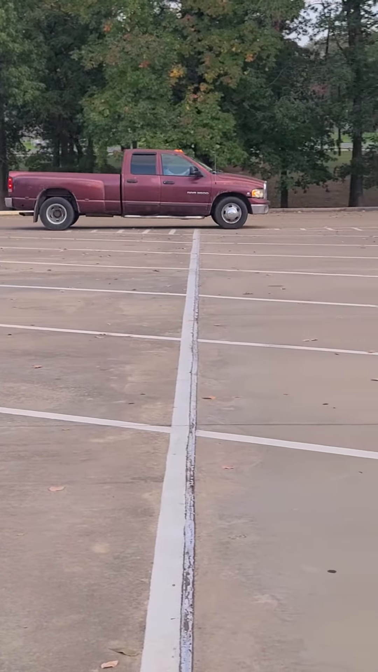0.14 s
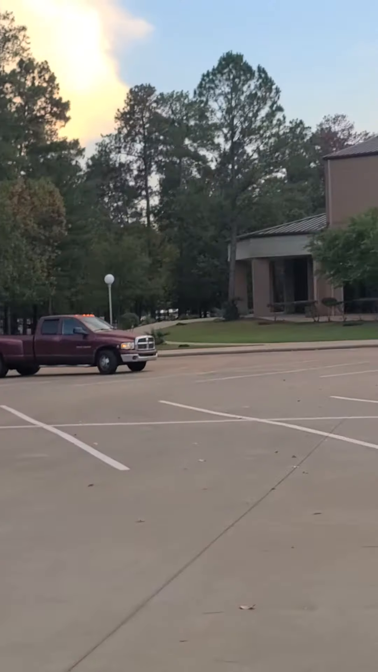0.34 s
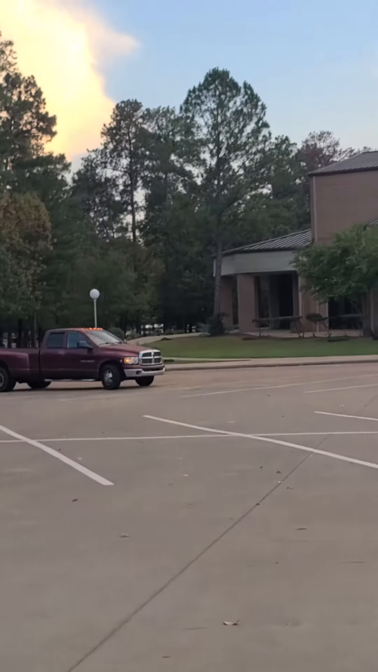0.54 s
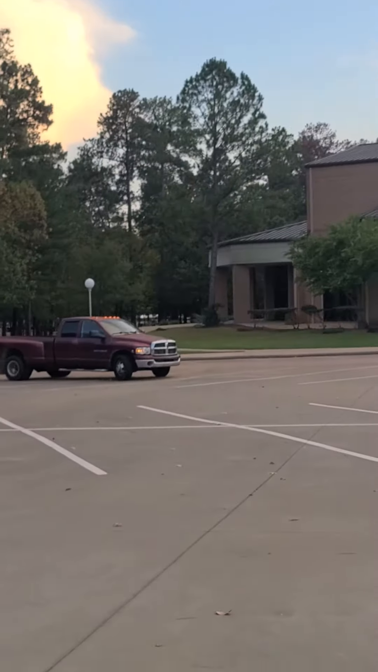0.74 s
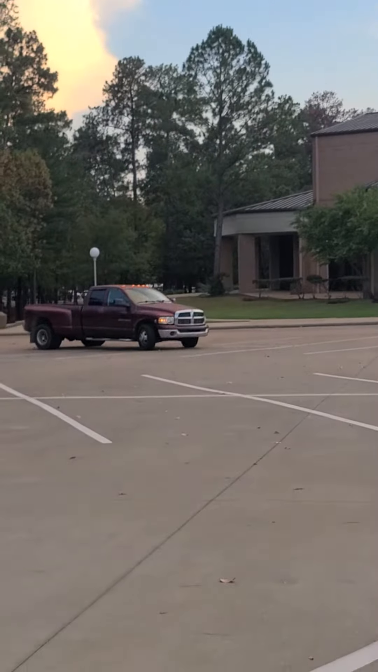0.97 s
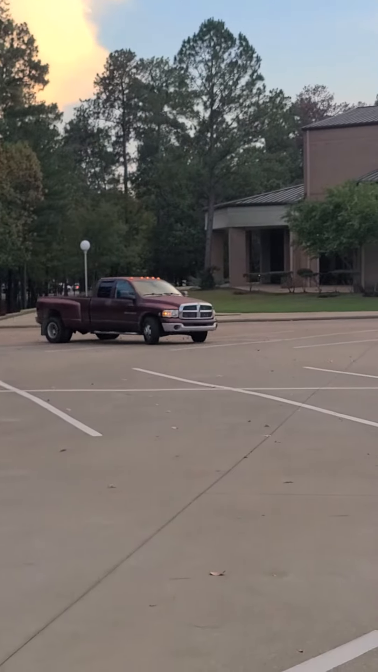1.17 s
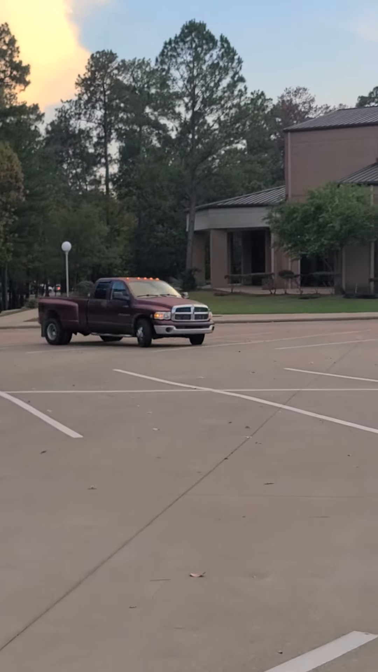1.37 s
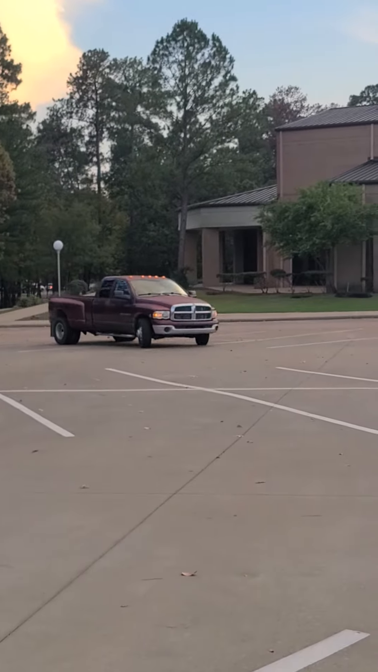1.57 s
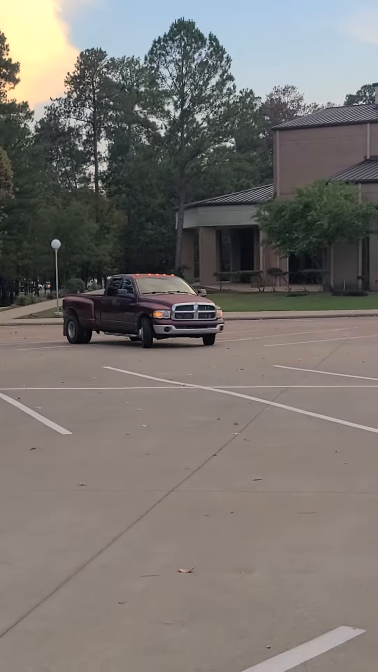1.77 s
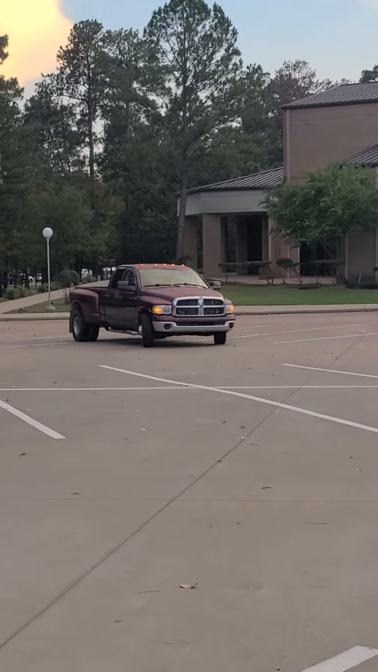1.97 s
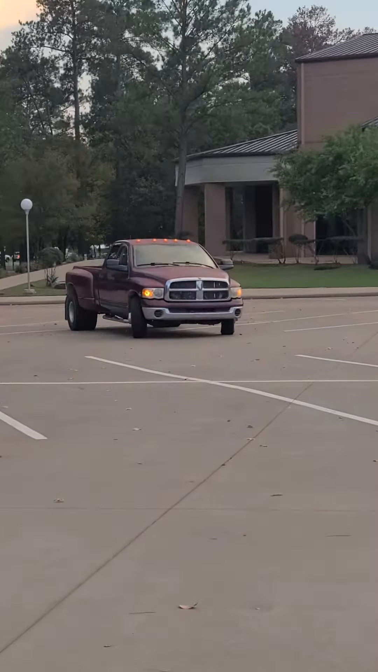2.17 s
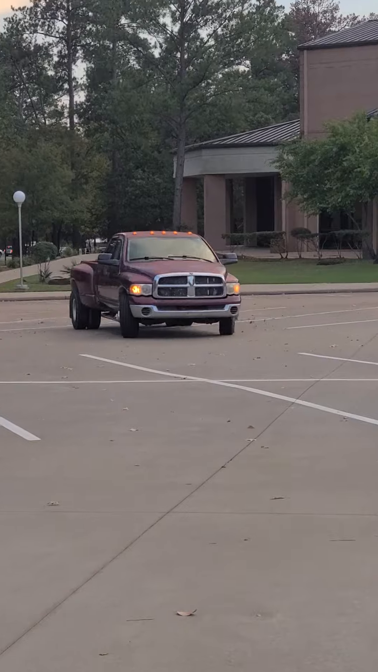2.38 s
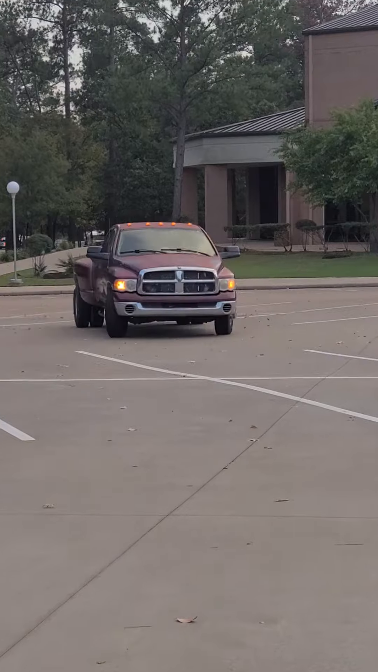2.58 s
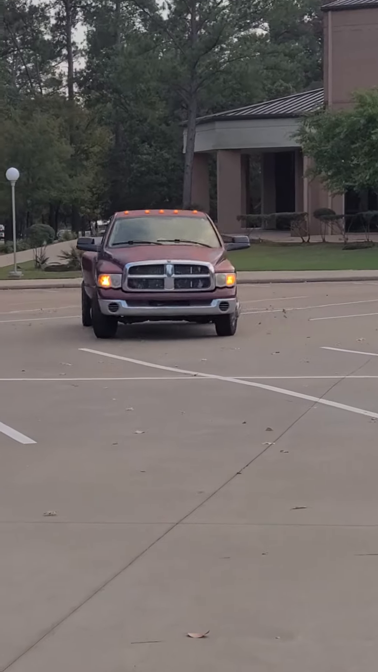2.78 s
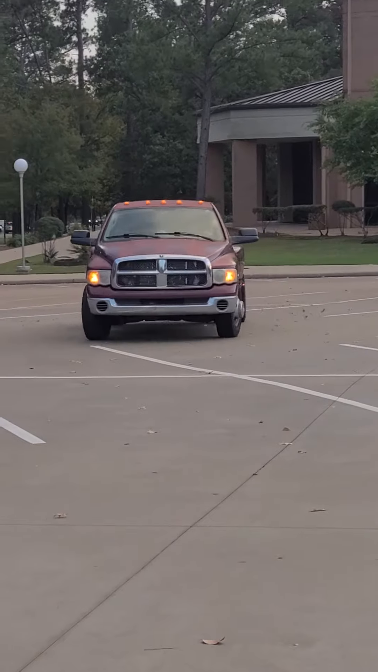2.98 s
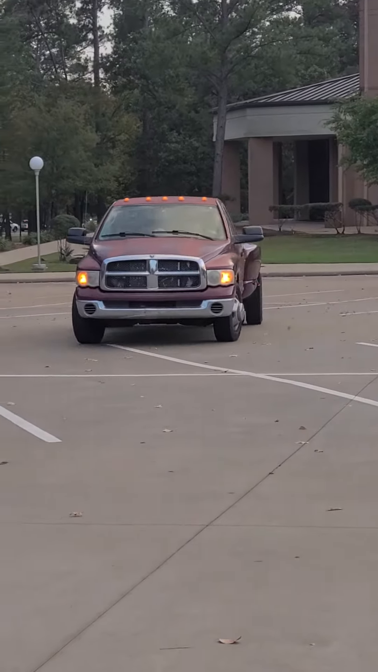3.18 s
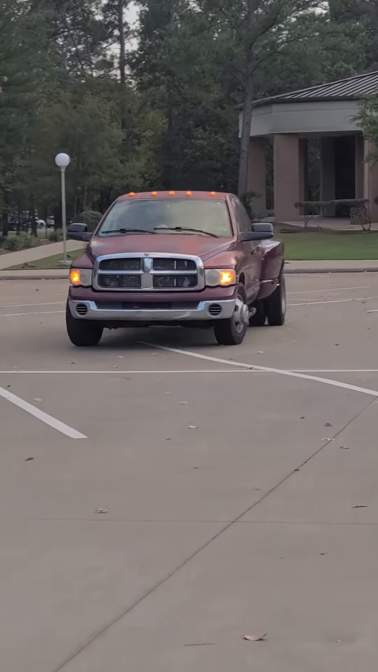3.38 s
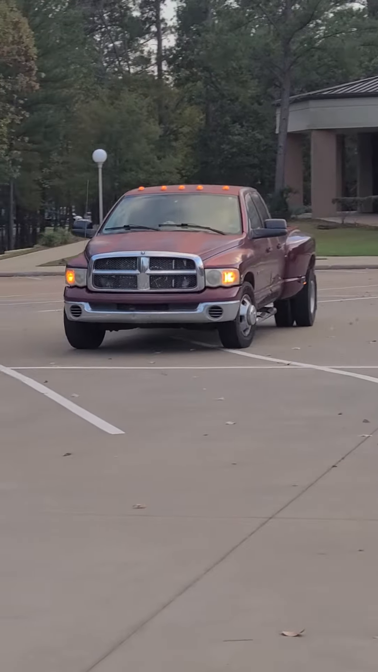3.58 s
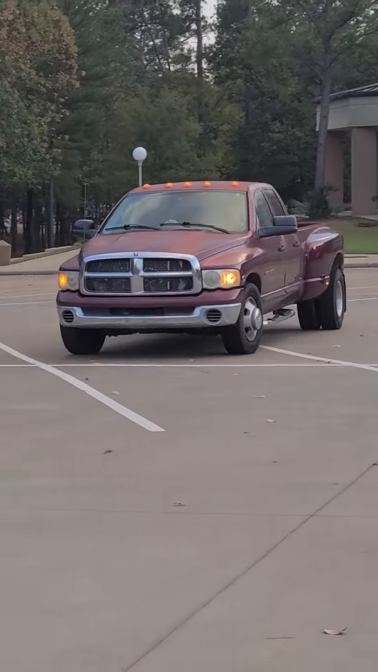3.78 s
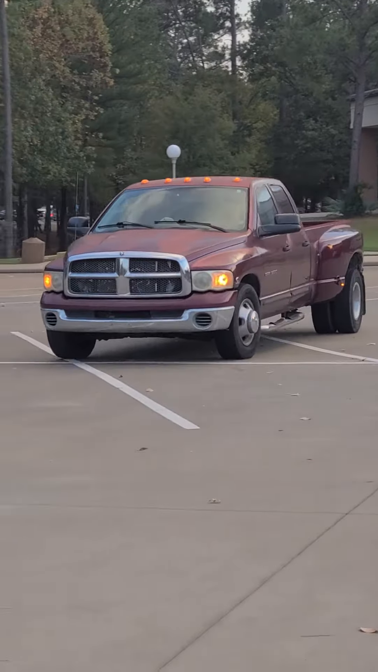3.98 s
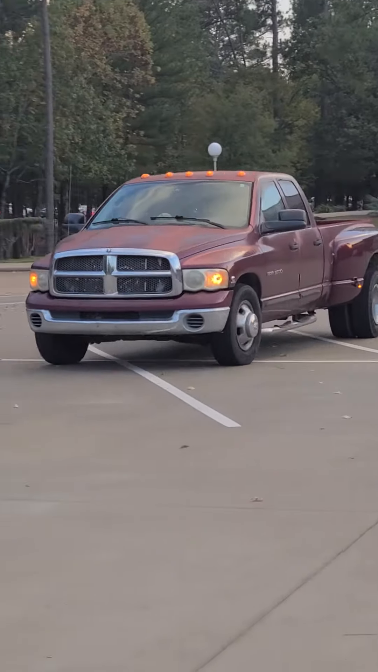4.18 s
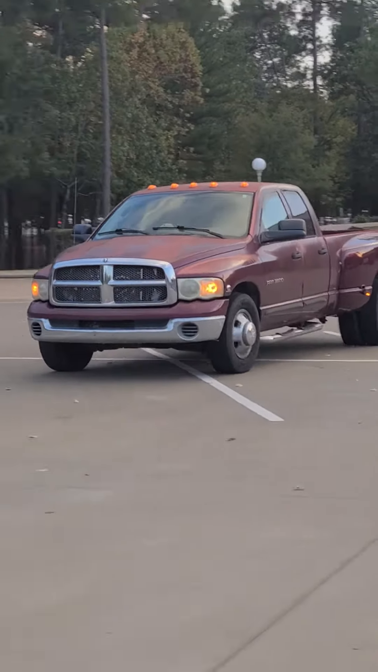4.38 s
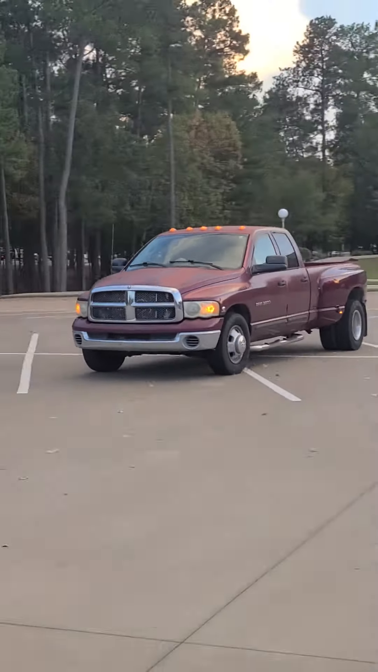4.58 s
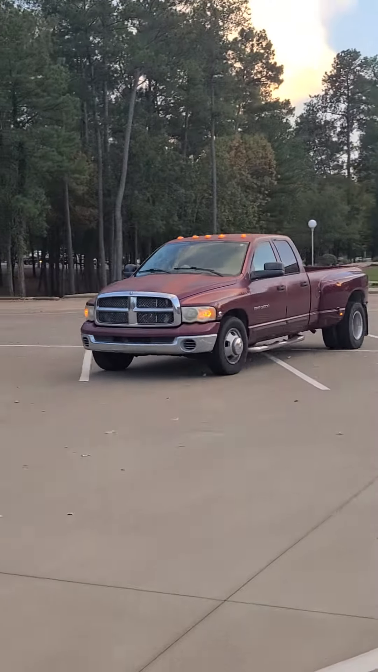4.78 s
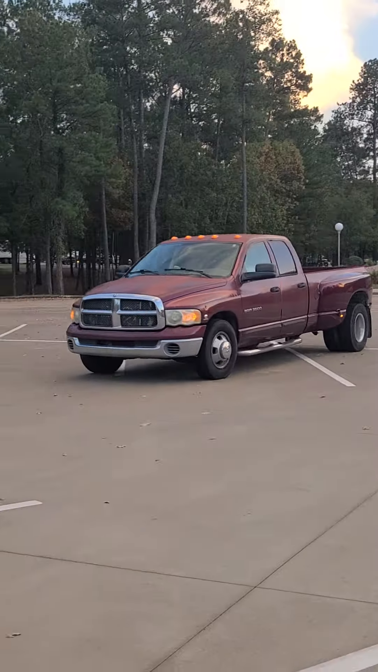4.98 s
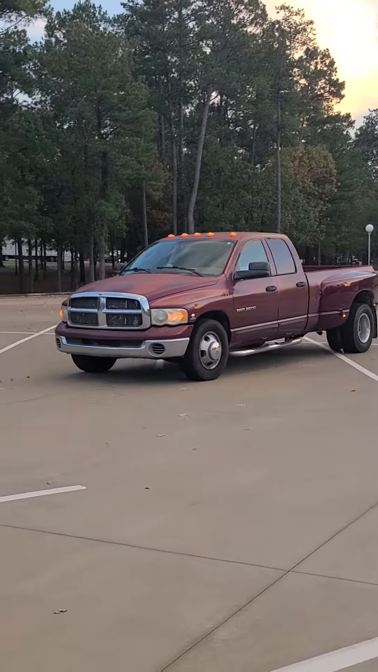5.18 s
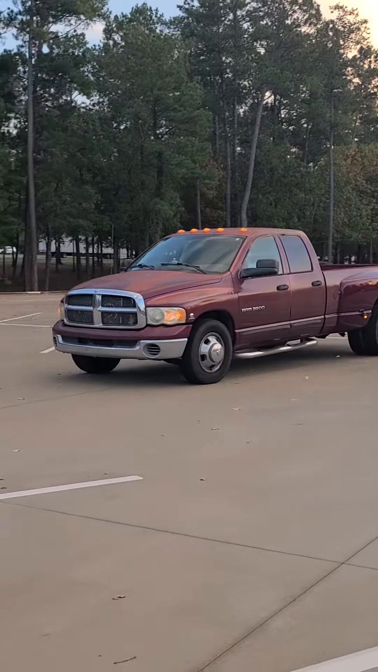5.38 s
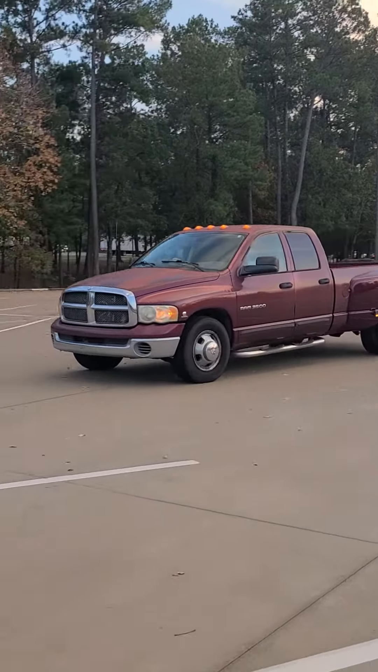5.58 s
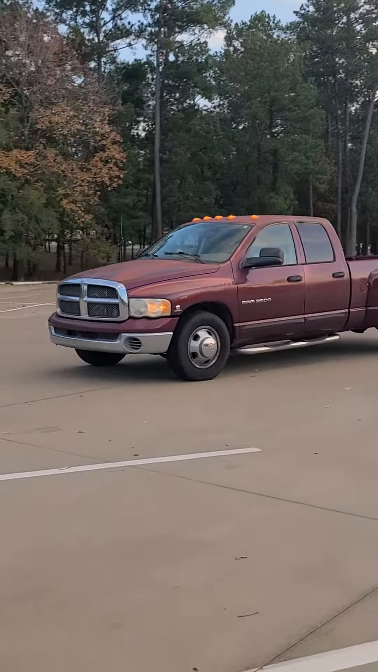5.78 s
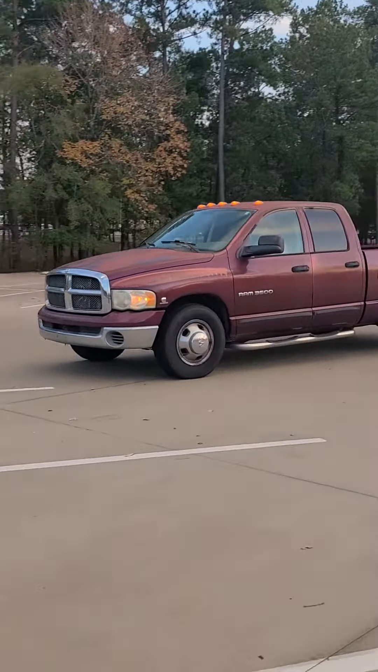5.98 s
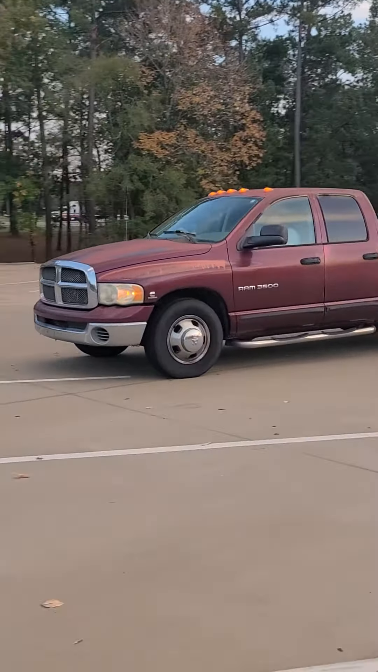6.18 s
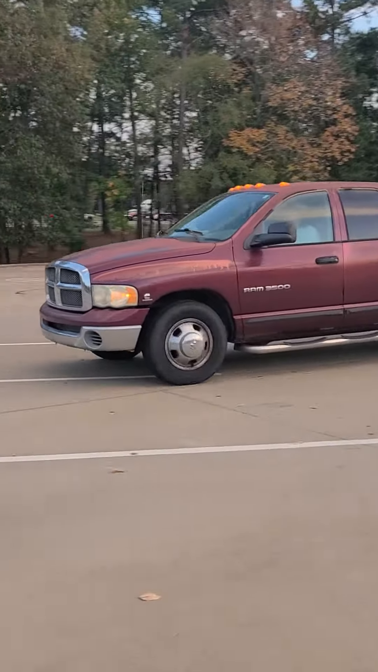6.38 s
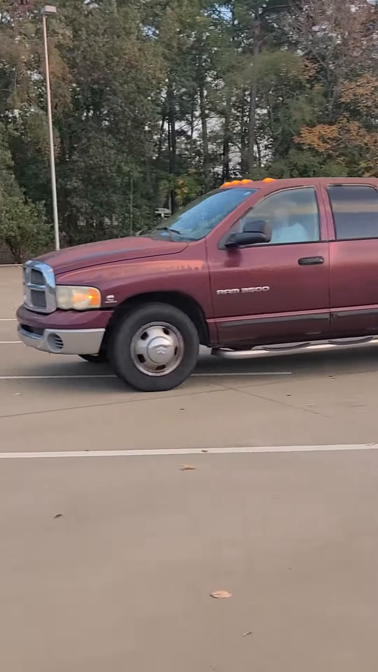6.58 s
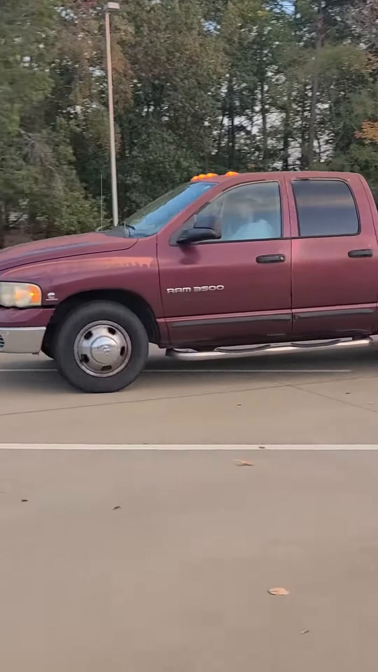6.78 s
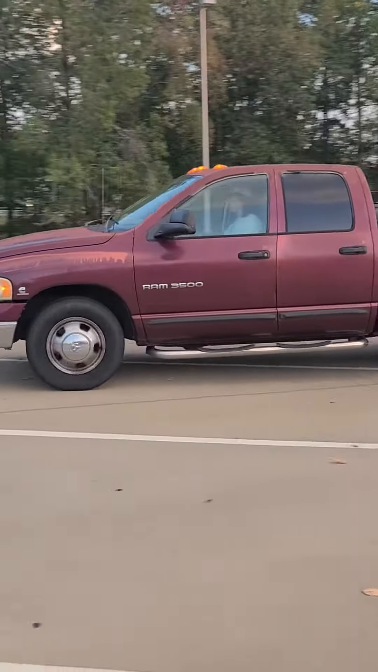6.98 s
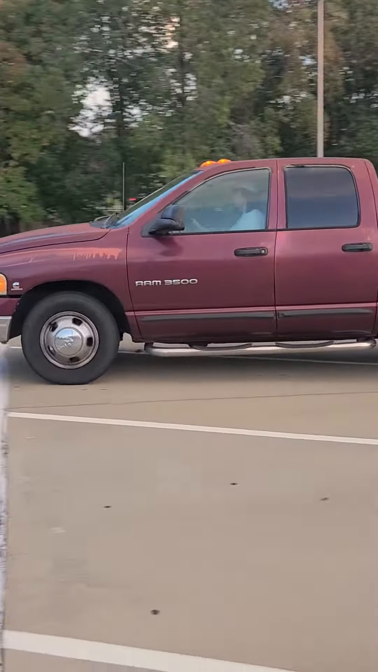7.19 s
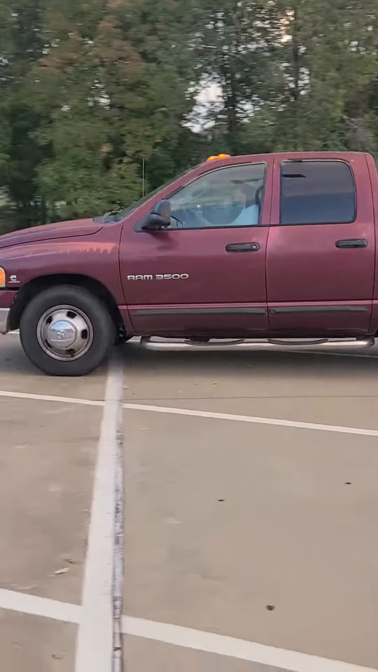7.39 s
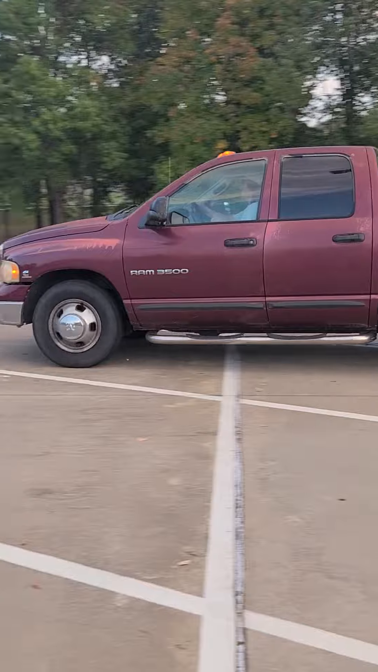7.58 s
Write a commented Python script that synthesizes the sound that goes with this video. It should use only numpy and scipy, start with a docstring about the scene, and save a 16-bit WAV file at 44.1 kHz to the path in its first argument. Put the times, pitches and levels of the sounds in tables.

```python
"""A diesel pickup clatters far off; then the viewpoint jumps and it turns across a paved lot and rolls past.
Its six cylinders knock in noise bursts that ring the block, work hard, drop to idle and pick up again nearby.
Gas rumbles and hums in the exhaust, and a near-pure deep drone swells and fades. Noise shaped in time and pitch
makes the airy treble, a whistle and grit crunching on the concrete. A wavering whine, a faint click where the
viewpoint jumps, a dry tick and a few thin squeaks, where metal rubs, add fine detail."""
import sys
import numpy as np
from scipy import signal
from scipy.fft import rfft, irfft
from scipy.io import wavfile
from scipy.ndimage import uniform_filter1d, minimum_filter1d

SR = 44100
rng = np.random.default_rng(int(sys.argv[2]) if len(sys.argv) > 2 else 0)


def dump(signal):
    """Clip the signal to [-1, 1] and save it as 16-bit WAV at the path in sys.argv[1]."""
    limited = np.clip(np.atleast_2d(signal).T, -1, 1)
    pcm = np.round(limited * 32767).astype(np.int16)
    wavfile.write(sys.argv[1], SR, pcm)


N = 337365
TIME = np.arange(N) / SR  # seconds
BINS = np.fft.rfftfreq(N, 1 / SR)  # Hz
CUT_S = .562  # the viewpoint jumps from far to near here
FIRST_CYLINDER_S = 5.092  # about when the first cylinder fires
IDLE_HZ = 44  # firings per second at idle
EDGE_HZ = 15900  # the sound stops above this pitch

# Engine speed, pulling through the turn and then idling: (time [s], firings per second [Hz])
FIRING_RATE = [(0, 76.5), (.55, 76.5), (.57, 82), (.88, 78), (1.3, 79.5), (1.62, 76), (1.9, 82),
               (2.4, 76.5), (2.62, 75.5), (2.78, 82.5), (3.0, 85), (3.35, 90), (3.7, 86.5), (4.05, 86.5),
               (4.3, 76), (4.8, 51), (5.0, 48.2), (5.25, 44.4), (6.15, 44.3), (6.3, 46.8), (6.47, 48),
               (6.75, 44.6), (7.0, 46.4), (7.3, 45.6), (7.65, 46.4)]
# Loudness as load and distance change, against the usual level: (time [s], level [dB])
ENGINE_LEVEL = [(0, -3.3), (.56, -2), (1.05, 1), (1.3, 0.2), (1.9, -1.5), (2.45, 3), (3.15, 5), (3.55, 5),
                (4.15, 1.9), (4.7, -3.5), (5.2, -5), (6.2, -3), (6.6, -0.1), (6.75, 2.5), (7.0, 3.5),
                (7.38, 2.5), (7.53, -1.1), (7.65, -1)]
# Relative strength of each cylinder's knock, one per cylinder: (level [dB])
CYLINDER_KNOCKS_DB = [-5, -5, -5, -6.5, -9.5, -7]
# Short blips of fuel that lift the near clatter: (time [s], length [s], lift [dB])
FUEL_BLIPS = [(6.321, 0.022, 7), (6.685, 0.032, 3.5)]
# Side of the truck towards the listener: (time [s], side [0 nose, 1 front corner, 2 flank])
FACING = [(.6, 0.52), (1.0, 0.36), (1.5, 0.54), (2.2, 0.44), (3.0, 0), (3.7, 0.26), (4.3, 0.76),
          (4.8, 0.83), (6.0, 1.124), (6.4, 1.15), (6.75, 1.9), (7.35, 1.86), (7.65, 1.3)]

# Colour of the clatter from far off, nose, front corner and flank: (pitch [Hz], relative level [dB per Hz])
FAR_COLOUR = [(250, -18), (340, -9), (440, -17), (570, -5), (650, -6.5), (780, -4), (950, -7), (1150, -7),
              (1400, -11), (1630, -16), (1880, -7.5), (2120, -15), (2470, -9.5), (3300, -22.5), (5070, -26),
              (5910, -20), (9500, -44.5), (13000, -49), (15500, -57)]
NOSE_COLOUR = [(250, -30), (400, -1), (640, -3.5), (850, -2.5), (1000, -1.5), (1350, 0.5), (2100, -3.5),
               (2600, -3.5), (3150, -3.5), (3900, -5), (4600, -16), (6200, -13.5), (7400, -35),
               (10400, -46)]
CORNER_COLOUR = [(250, -22), (380, -1.5), (490, -7.5), (680, -2), (800, -1), (950, -3), (1200, -1),
                 (1600, -7.5), (1850, -2.5), (2350, -7.5), (3100, -5), (4400, -9.5), (6300, -12.5),
                 (7600, -30.5), (10400, -80)]
FLANK_COLOUR = [(250, -44), (400, -8.5), (483, -23), (560, -14), (630, -15), (800, -6), (930, -12),
                (1320, -1.5), (1680, -15.5), (2000, -6.5), (2750, -8), (3650, -7), (4300, -15.5),
                (6230, -20), (8000, -41), (10400, -71)]
# Block and panel resonances from the same four views; near ones go negative where the ground echo cancels:
# (pitch [Hz], width [Hz], lift [dB])
FAR_RINGS = [(727, 46, 4), (1195, 38, 7), (1910, 99, 5.5), (2510, 90, 6.5), (2960, 110, 9.5), (3720, 80, 9),
             (4030, 250, 7), (5930, 240, 6)]
NOSE_RINGS = [(1010, 40, 2), (1177, 12, 7.5), (1270, 37, 1.5), (2390, 100, 4.5), (3010, 89, 5),
              (3290, 280, 3.5), (5000, 200, 4), (5170, 190, -5)]
CORNER_RINGS = [(1746, 140, 5), (2930, 140, 1), (4860, 200, -1), (5320, 400, -6)]
FLANK_RINGS = [(840, 37, 0), (1180, 50, -4), (1342, 55, 0), (2830, 150, 6.5), (4320, 430, -6),
               (4700, 200, -1), (5330, 250, -3)]
# Resonances heard while the truck is across the lot, negative where the ground echo cancels:
# (pitch [Hz], width [Hz], lift [dB])
ACROSS_RINGS = [(1060, 70, -3.5), (1590, 250, 3), (2240, 130, 0.5), (2460, 200, 3), (2680, 90, 1),
                (4560, 280, -3), (4900, 250, 3)]
# How much they stand out as it nears: (time [s], share [0-1])
ACROSS_SHARE = [(1.5, 0.95), (2.3, 0)]

# Relative strength of each piston's slap, one per cylinder: (level [dB])
PISTON_SLAPS_DB = [0, -10, -2, -2, -8, -10]
# Ways the block rings when slapped: (pitch [Hz], width [Hz], relative level [dB])
SLAP_MODES = [(1090, 84, -9.5), (1178, 44, -11), (1300, 150, -13), (1790, 140, -20), (2880, 250, -9)]

# Colour of the gas rumble and of the lowest throb: (pitch [Hz], relative level [dB per Hz])
RUMBLE_COLOUR = [(60, -10), (95, 0), (120, 1), (140, -1), (170, 0.5), (200, 1), (240, -3), (300, -4.5),
                 (400, -12), (520, -19.5), (900, -67)]
THROB_COLOUR = [(10, -46), (25, -32), (36, -17), (46, -5), (62, 4), (75, -14), (100, -3), (200, -68)]
# Standing waves in the exhaust pipe: (pitch [Hz], width [Hz], lift [dB])
PIPE_RINGS = [(180, 19, 2), (237, 11.4, 2.5), (352, 40, 4)]
# Gas rumble in the pipe: (time [s], level [dB])
RUMBLE_LEVEL = [(0, -26), (.25, -28), (.6, -29.5), (1.55, -30.5), (1.9, -28), (2.58, -26.5), (2.75, -25.5),
                (3.6, -23.5), (4.1, -27.5), (4.6, -30.5), (5.2, -31.5), (6.1, -31), (6.35, -29.5),
                (6.75, -29), (7.1, -27), (7.65, -29)]
# Faint engine notes: (multiple of the firing rate [count])
NOTE_ORDERS = [1, 3, 4, 9]
# Their levels against one common level: (level [dB])
NOTES_DB = [-25, -13, -14.5, -19.5]
# Exhaust hum at twice the firing rate: (time [s], level [dB])
HUM_LEVEL = [(.5, -45), (.6, -29.5), (.92, -34.5), (1.25, -25.5), (1.42, -27), (1.55, -39), (1.95, -34),
             (2.25, -37), (2.42, -26.5), (2.7, -32.5), (3.2, -26.5), (3.55, -33), (3.95, -26.5),
             (4.2, -26.5), (4.5, -53), (5.2, -28), (6.0, -34), (6.45, -23), (6.8, -41), (7.65, -27.5)]

# Deep drone: (time [s], pitch [Hz])
DRONE_PITCH = [(0, 83.2), (0.35, 82.4), (.9, 77.7), (1.8, 79.5), (3, 80.3), (5.2, 79.94), (6, 81.33),
               (7.65, 80.5)]
# Swells of the drone, before a small trim; the throb follows them more gently: (time [s], level [dB])
DRONE_LEVEL = [(0, -23.5), (.35, -25), (.45, -39), (.555, -29), (.59, -19.5), (.7, -28), (1.15, -26),
               (1.42, -40), (1.49, -24.5), (1.59, -15), (1.68, -22), (1.81, -22.5), (1.88, -12),
               (1.98, -10.5), (2.04, -26), (2.13, -15.5), (2.25, -14.5), (2.63, -16.5), (2.74, -28),
               (2.93, -9.5), (3.03, -23.5), (3.13, -12.5), (3.2, -24), (3.25, -18), (3.33, -24),
               (3.64, -19), (3.87, -6), (3.96, -15), (4.04, -4.5), (4.14, -8.5), (4.24, -15.5),
               (4.43, -7.5), (4.56, -19), (4.68, -11), (5.0, -13.5), (5.95, -16.5), (6.2, -9.5), (6.4, -14),
               (6.85, -9), (7.1, -14), (7.35, -10.5), (7.48, -17.5), (7.65, -12)]
# The drone's overtones at two and three times its pitch: (time [s], level [dB])
OCTAVE_LEVEL = [(0, -55), (2.1, -49), (2.9, -34), (3.3, -27.5), (3.8, -41), (4.45, -27), (4.8, -43),
                (5.15, -34), (5.45, -47), (5.95, -32), (6.4, -38.5), (7.65, -39)]
TWELFTH_LEVEL = [(0, -52), (.25, -32.5), (.6, -56), (2.6, -39), (2.78, -28), (3.2, -36), (3.5, -39),
                 (4.0, -34), (4.5, -45), (5.5, -48), (6.3, -38), (6.75, -44.5), (7.1, -36), (7.65, -39.5)]

# Whine, loudest head-on: (time [s], level [dB])
WHINE_LEVEL = [(0, -38.5), (.9, -50), (1.7, -49), (2.6, -53), (2.75, -31), (3.2, -37), (3.65, -39),
               (4.0, -56), (4.6, -75)]
# Airy whistle, heard from the flank: (time [s], level [dB])
WHISTLE_LEVEL = [(6.1, -62), (6.36, -45), (6.65, -46), (6.85, -34), (6.95, -48), (7.2, -43.5), (7.48, -50),
                 (7.6, -40), (7.65, -43)]
# Colour of the fine treble: (pitch [Hz], relative level [dB per Hz])
FIZZ_COLOUR = [(6000, -48), (8000, -6), (9000, 5), (11000, 5), (12700, 7.5), (14000, 5), (15800, -0.5)]
# Fine treble, highest as the tyres scrub out of the turn: (time [s], level [dB])
FIZZ_LEVEL = [(.57, -52), (1.0, -47), (2.0, -49), (2.4, -44.5), (3.1, -42.3), (3.7, -42), (4.2, -42.5),
              (4.7, -49.5), (5.2, -51), (6.0, -50), (6.5, -47), (7.2, -48), (7.65, -47.5)]

# Colour of grit as it grinds and as it snaps: (pitch [Hz], relative level [dB per Hz])
GRIT_COLOUR = [(1200, -24), (2400, -10), (3200, 9), (5000, 1), (6300, 5.5), (7800, -17), (10000, -57)]
SNAP_COLOUR = [(3000, -15), (6000, -6), (7800, -17), (9200, -3), (12000, 1.5), (14000, -2), (15500, -1.5)]
# Crunches, with the length scale of their rise: (peak time [s], length [s], grinding [dB], snapping [dB])
CRUNCHES = [(0.654, 0.023, -29, -39.5), (.922, 0.019, -46, -44), (1.585, 0.0029, -31, -25),
            (1.594, 0.0054, -22.5, -25), (1.604, 0.0058, -32, -27), (2.465, 0.0084, -46, -43),
            (2.721, 0.021, -42, -34), (3.504, 0.0047, -54, -23), (3.507, 0.00076, -52, -14),
            (4.28, 0.0018, -55, -37), (4.7812, 0.0012, -31, -34), (4.788, .0014, -26, -27),
            (4.79, 0.011, -31.5, -33), (5.35, 0.029, -40, -40.5), (6.463, .03, -42, -41)]
# A faint click where the viewpoint jumps, then a lone dry tick: (time [s], peak level [dB], half width [s])
CLICKS = [(.563, -24, .000016), (.9873, -8, .0001)]
# Squeaks: (start [s], length [s], pitch [Hz], glide [share of pitch], level [dB], octave against it [dB])
SQUEAKS = [(2.746, 0.15, 6230, .012, -38, -2), (3.758, 0.06, 6260, .01, -48, 8),
           (3.826, 0.087, 6330, -0.0074, -37, 1.5), (7.486, 0.072, 6190, -.024, -32.5, -1.5),
           (7.561, 0.1, 6110, .022, -28, 0)]

# Two microphone ports, left against right: (pitch [Hz], left minus right [dB])
BALANCE = [(60, -3.5), (200, -2.5), (380, -3.5), (700, -2.5), (1290, -2), (2380, -7.5), (4400, -10),
           (6300, -4.5), (9000, -2.5), (13000, -11.5)]
# How alike the two ports sound: (pitch [Hz], likeness [0-1])
LIKENESS = [(60, 0.99), (290, 0.96), (640, 0.85), (1400, 0.84), (3100, 0.85), (6800, 0.2), (15000, 0.32)]
# How far the left port leads: (pitch [Hz], lead [radians])
LEAD = [(60, -0.15), (1200, 0.32), (2200, 0.57), (3000, -0.8), (4100, 1), (4900, -0.4), (6300, 1.04),
        (8000, 2), (9500, 0), (15000, -0.5)]


def amp(db):
    """Turns decibels into a gain."""
    return np.exp(np.asarray(db) * (np.log(10) / 20))


def unit(x):
    """Scales a sound to an average strength (rms) of 1."""
    return x / np.sqrt(np.mean(x ** 2) + 1e-20)


def curve(rows):
    """Draws straight lines between the points of a table over time."""
    return np.interp(TIME, *np.transpose(rows))


def across(points):
    """Spreads a table over pitch to every frequency bin, on a log scale."""
    hz, value = np.transpose(points)
    return np.interp(np.log(BINS + 1), np.log(hz + 1), value)


def wander(rate_hz):
    """Makes a smooth random drift of rms 1; a higher rate moves faster."""
    hz = BINS[:N // 16]  # higher bins stay empty
    a, b = rng.standard_normal((2, len(hz)))
    spectrum = (a + 1j * b) * np.exp(-np.minimum((hz / rate_hz) ** 2, 20))
    return unit(irfft(spectrum, N))


def ports(pair, colour_db=0):
    """Colours two unrelated signals and blends them for the left and right ports; their middle has rms 1."""
    a, b = rfft(pair) * amp(colour_db)
    like = np.clip(across(LIKENESS), 0, 1)
    blend = like * a + np.sqrt(1 - like ** 2) * b
    left = blend * amp(across(BALANCE)) * np.exp(1j * across(LEAD))
    out = irfft(np.array([left, a]), N)
    return out / np.sqrt(np.mean(out.mean(0) ** 2) + 1e-20)


def placed(x, balance_db):
    """Places a mono sound to one side; a negative balance makes the right louder."""
    gains = amp([[balance_db / 2], [-balance_db / 2]])
    return x * gains / gains.mean()


def hiss():
    """Makes two unrelated white noises."""
    return rng.standard_normal((2, N))


def bump(s, length):
    """Makes a bell-shaped swell in time."""
    return np.exp(-2 * np.minimum(((TIME - s) / length) ** 2, 10))


def lift(rings):
    """Adds up the dB that resonances give each frequency bin."""
    return sum(db / (1 + (2 * (BINS - hz) / width) ** 2) for hz, width, db in rings)


def crankshaft(unsteady=0.023):
    """Counts the firings so far, each slightly early or late."""
    firings = np.cumsum(curve(FIRING_RATE)) / SR
    offset = -np.interp(FIRST_CYLINDER_S, TIME, firings) % len(CYLINDER_KNOCKS_DB)
    return firings + offset + unsteady * wander(7.6)


def knocks(firings, decay_s, between, uneven_db):
    """Shapes combustion knocks that die quickly, each cylinder with its own strength."""
    count = firings.astype(int)
    age = (firings % 1) / curve(FIRING_RATE)  # seconds since the last firing
    uneven = uneven_db * rng.standard_normal(N)[count]
    size_db = np.take(CYLINDER_KNOCKS_DB, count, mode="wrap") + uneven
    return unit(between + amp(size_db) * np.exp(-age / decay_s))


def fizz(firings, flicker_db=1.5):
    """Fine treble of air and rolling tyres, lightly pulsed by the engine."""
    flicker = unit(amp(flicker_db * wander(26)))
    drive = hiss() * flicker * knocks(firings, decay_s=0.0077, between=1.7, uneven_db=6.5)
    return ports(drive, across(FIZZ_COLOUR)) * amp(curve(FIZZ_LEVEL)) * (TIME > CUT_S)


def whistle(hz=4690, drift_hz=45, width_hz=140, broken_db=4.0):
    """Air whistles faintly in the engine bay: a narrow, broken hiss whose pitch drifts."""
    turn = 2 * np.pi * np.cumsum(hz + drift_hz * wander(10)) / SR
    air = wander(width_hz) * np.cos(turn) + wander(width_hz) * np.sin(turn)
    return placed(air * amp(curve(WHISTLE_LEVEL) + broken_db * wander(38)), -4)


def whine(hz=739, waver=0.7, shimmer_db=1.8):
    """A narrow, wavering whine from the engine bay; its phase (radians) and level both drift."""
    tone = np.sqrt(2) * np.sin(2 * np.pi * hz * TIME + waver * wander(16))
    return placed(tone * amp(curve(WHINE_LEVEL) + shimmer_db * wander(18)), -5.5)


def clicks():
    """A faint click as the viewpoint jumps and a lone dry tick: one push and pull of pressure each."""
    out = np.zeros(N)
    for s, db, width in CLICKS:
        u = (TIME - s) / width
        out -= amp(db) * u * np.exp((1 - u ** 2) / 2)
    return placed(out, -16)


def squeaks(jitter=0.012, flutter=0.004, rasp=0.2, chatter_db=2.6):
    """Rubbing metal sings a thin, rough note and its octave, gliding a little."""
    out = np.zeros(N)
    waver = 1 + jitter * wander(416) + flutter * wander(66.0)  # factor on the pitch
    scrape = rasp * wander(1500)  # radians
    for s, length, hz, glide, db, octave_db in SQUEAKS:
        on = (TIME > s) & (TIME < s + length)
        progress = (TIME[on] - s) / length
        pitch = hz * waver[on] * (1 + glide * (progress - .5))
        phase = 2 * np.pi * np.cumsum(pitch) / SR + scrape[on]
        swell = np.abs(np.sin(np.pi * progress)) ** 0.77
        out[on] += amp(db) * swell * (np.sin(phase) + amp(octave_db) * np.sin(2 * phase))
    return placed(out * amp(chatter_db * wander(120)), -11)


def grit(grain_db=3.5, rise=1.0, fall=1.68):
    """Crunches are clumps of tiny fractures that start fast and trail off: a rasp with a bright snap."""
    fractures = np.tanh(hiss()) * amp(grain_db * np.clip(wander(800), -2, 2))
    grinding, snapping = np.zeros(N), np.zeros(N)
    for s, length, grind_db, snap_db in CRUNCHES:
        clump = bump(s, length * np.where(TIME < s, rise, fall))
        grinding += amp(grind_db) * clump
        snapping += amp(snap_db) * clump
    rasp = ports(fractures, across(GRIT_COLOUR)) * grinding
    return rasp + ports(fractures, across(SNAP_COLOUR)) * snapping


def drone(level_db=-0.63, flutter_db=1.26, flutter_hz=10, unsteady_db=-32):
    """A nearly pure bass tone that swells and fades, flutters most when weak, and has two wavering overtones."""
    phase = 2 * np.pi * np.cumsum(curve(DRONE_PITCH)) / SR + 0.087 * wander(3.5)
    flutter = flutter_db * wander(flutter_hz) + .5 * wander(56)
    strength = amp(curve(DRONE_LEVEL) + level_db + flutter)
    tone = np.sin(phase) * (strength + amp(unsteady_db) * wander(flutter_hz))
    octave = amp(curve(OCTAVE_LEVEL)) * np.sin(2 * phase + 0.66 * wander(9.6))
    twelfth = amp(curve(TWELFTH_LEVEL)) * np.sin(3 * phase + 0.52 * wander(1.6))
    overtones = (octave + twelfth) * amp(wander(2.7))
    return placed(np.sqrt(2) * (tone + overtones), -1.85)


def exhaust(firings, notes_db=-30.0, follow=0.88, throb_db=-25.5, throb_follow=0.39,
            idle_note_db=-36.0, lope_db=-32):
    """Puffs of gas rumble in the pipe under notes tied to the firing rate; a low throb swells with the drone."""
    puffs = knocks(firings, decay_s=0.004, between=0.75, uneven_db=1.5)
    gas = ports(hiss() * puffs, across(RUMBLE_COLOUR) + lift(PIPE_RINGS)) * amp(curve(RUMBLE_LEVEL))
    turn = 2 * np.pi * firings
    notes = sum(amp(notes_db + db + 3.2 * wander(15.0)) * np.sin(k * turn + 0.31 * wander(3.9))
                for k, db in zip(NOTE_ORDERS, NOTES_DB))
    hum = amp(curve(HUM_LEVEL) + wander(4.1)) * np.sin(2 * turn)
    # uneven cylinders, heard from far off as a note at one and a half times the firing rate
    lope = amp(lope_db + 3.1 * wander(6.9)) * np.sin(turn + turn / 2) * (TIME < CUT_S)
    load = amp(follow * curve(ENGINE_LEVEL))
    tones = placed(np.sqrt(2) * (notes * load + hum + lope), -1.8)
    throb = ports(hiss() * puffs, across(THROB_COLOUR)) * amp(throb_db)
    beat = placed(amp(idle_note_db) * np.sin(turn), -1.5)
    swell = amp(throb_follow * curve(DRONE_LEVEL))
    return gas + tones + (throb + beat) * swell


def slap(firings, idle_db=-36.0, db_per_hz=-.22, uneven_db=.7):
    """Pistons strike their bores, three of six hard, and the block rings; it fades as the engine speeds up."""
    count = firings.astype(int)
    uneven = uneven_db * rng.standard_normal(N)[count]
    force = amp(np.take(PISTON_SLAPS_DB, count, mode="wrap") + uneven)
    strikes = np.diff(count, prepend=count[0])  # one blow a firing
    t = TIME[:2000]
    ring = sum(amp(db) * np.sqrt(width) * np.exp(-np.pi * width * t) * np.sin(2 * np.pi * hz * t)
               for hz, width, db in SLAP_MODES)
    ring = ring * (1 - np.exp(-t / 0.004))  # the heavy block takes a moment to answer
    blows = unit(signal.oaconvolve(strikes * force, ring)[:N])
    level_db = idle_db + db_per_hz * (curve(FIRING_RATE) - IDLE_HZ)
    return placed(blows * amp(level_db), -7.0)


def panels(pair, ring_db=-7, decay_s=0.0081, drift_hz=6.2, count=3):
    """Weak panel modes and reflections ring on briefly; their ripple drifts as the truck moves."""
    t = TIME[:1500]
    out = pair
    for _ in range(count):
        ring = rng.standard_normal(len(t)) * np.exp(-t / decay_s)
        rung = signal.oaconvolve(pair, ring[None] / np.linalg.norm(ring), axes=1)[:, :N]
        out = out + amp(ring_db) / np.sqrt(count) * np.tanh(wander(drift_hz)) * rung
    return out


def clatter(firings, tick_db=1.0, near_db=-26.5, far_db=-25.0):
    """Knocks and valve ticks ring the block; the colour turns as the truck shows its nose, corner and flank."""
    wash = 2.3 * amp(.7 * curve(ENGINE_LEVEL))  # noise fills the gaps between knocks as the load grows
    beats = knocks(firings, decay_s=0.007, between=wash, uneven_db=.6)
    steady = beats / np.sqrt(uniform_filter1d(beats ** 2, size=12000))  # evens out the slow loudness
    drive = panels(hiss() * steady * amp(tick_db * wander(150)))

    distant = irfft(rfft(drive) * amp(lift(ACROSS_RINGS)), N)
    nearing = drive + np.clip(curve(ACROSS_SHARE), 0, 1) * (distant - drive)
    sides = [(NOSE_COLOUR, NOSE_RINGS), (CORNER_COLOUR, CORNER_RINGS), (FLANK_COLOUR, FLANK_RINGS)]
    facing = np.clip(curve(FACING), 0, 2)
    near = sum(np.maximum(1 - np.abs(facing - k), 0) * ports(nearing, across(colour) + lift(rings))
               for k, (colour, rings) in enumerate(sides))
    blips_db = sum(db * bump(s, length) for s, length, db in FUEL_BLIPS)

    far = ports(drive, across(FAR_COLOUR) + lift(FAR_RINGS))
    heard = np.where(TIME < CUT_S, far * amp(far_db), near * amp(near_db + blips_db))
    return heard * amp(curve(ENGINE_LEVEL))


def scene():
    """Adds all sources; one slightly uneven crankshaft times the engine's layers."""
    firings = crankshaft()
    details = fizz(firings) + whistle() + whine() + clicks() + squeaks() + grit()
    engine = drone() + exhaust(firings) + slap(firings) + clatter(firings)
    return details + engine


def record(dry):
    """A quick limiter holds the largest peaks to full scale; then a filter removes the highest treble."""
    edge = signal.firwin(601, EDGE_HZ, window=("kaiser", 9), fs=SR)
    room = np.minimum(1, 1 / (abs(dry).max(0) + 1e-9))
    gain = uniform_filter1d(minimum_filter1d(room, size=401), size=401)
    return signal.oaconvolve(dry * gain, edge[None], "same", axes=1)


dry = scene()
out = record(dry)
dump(out)
```